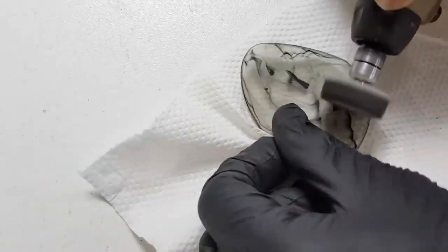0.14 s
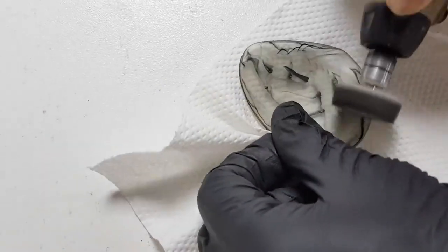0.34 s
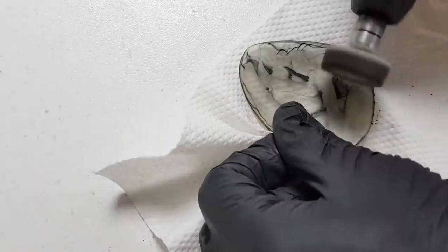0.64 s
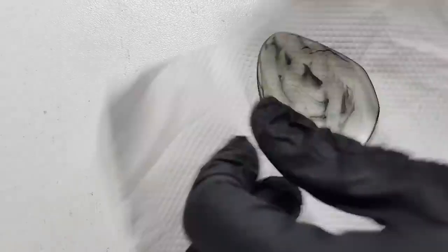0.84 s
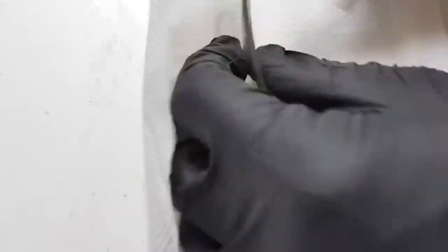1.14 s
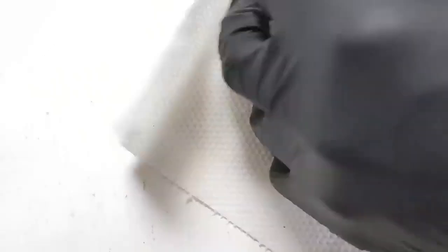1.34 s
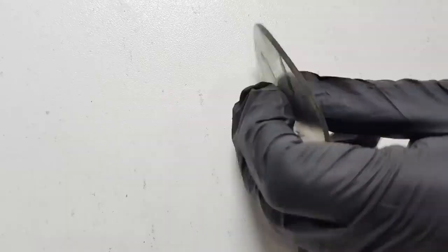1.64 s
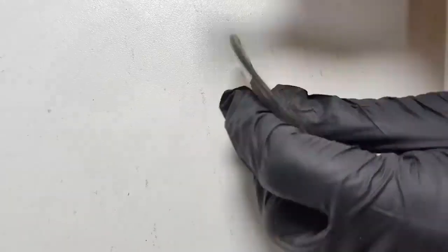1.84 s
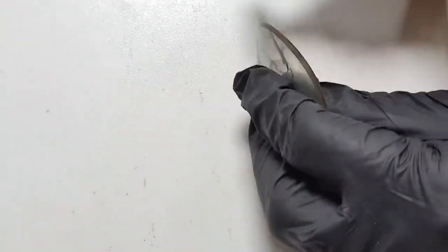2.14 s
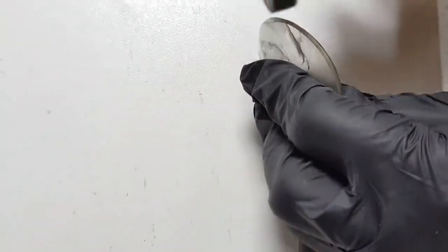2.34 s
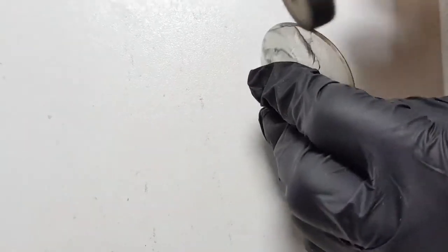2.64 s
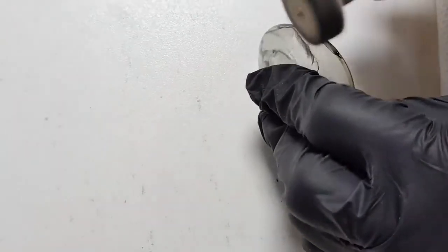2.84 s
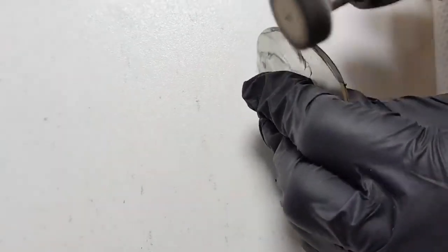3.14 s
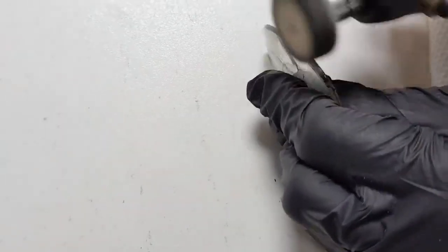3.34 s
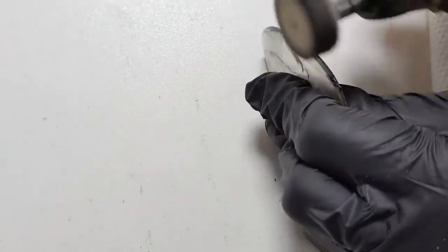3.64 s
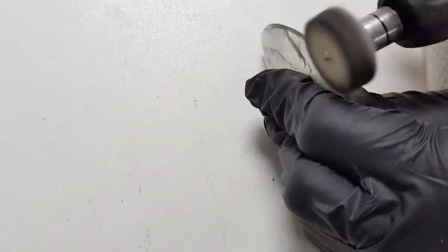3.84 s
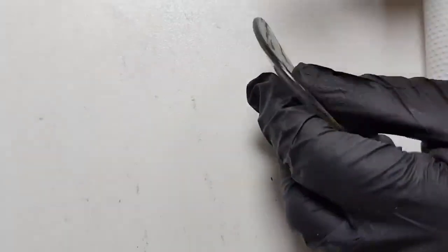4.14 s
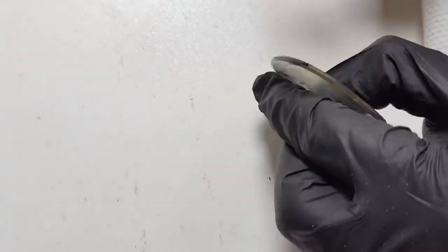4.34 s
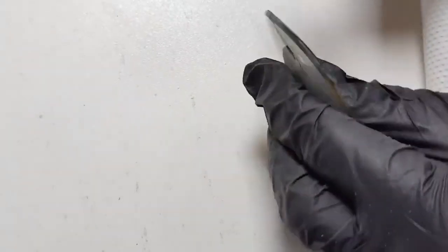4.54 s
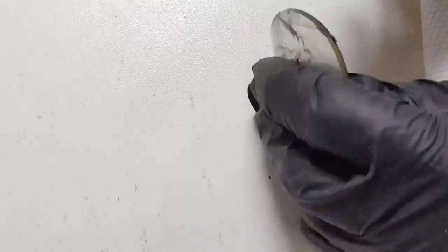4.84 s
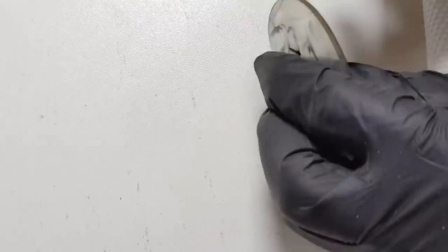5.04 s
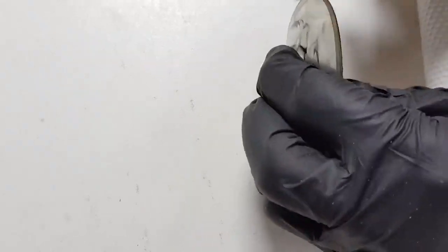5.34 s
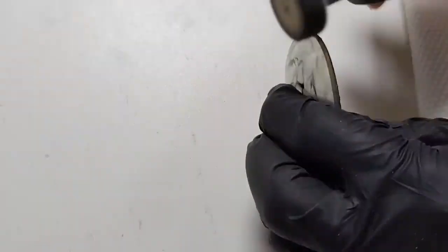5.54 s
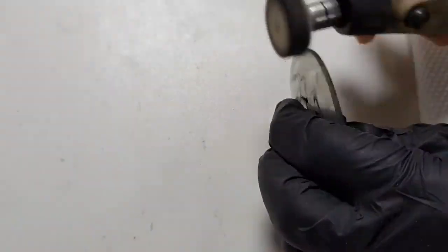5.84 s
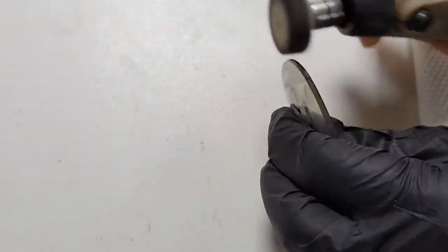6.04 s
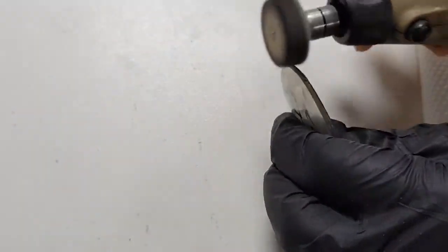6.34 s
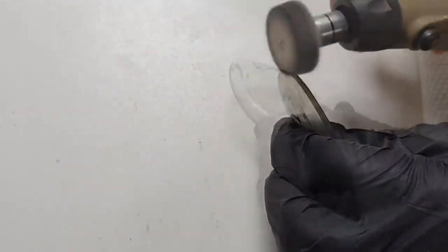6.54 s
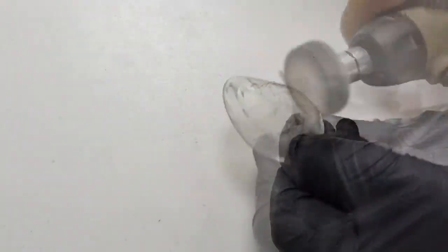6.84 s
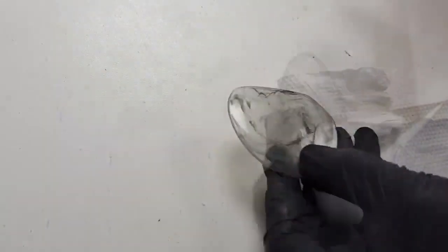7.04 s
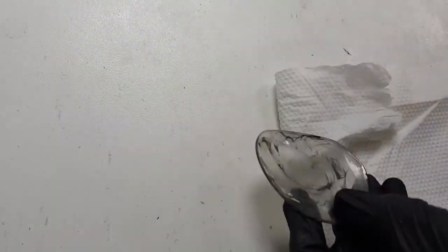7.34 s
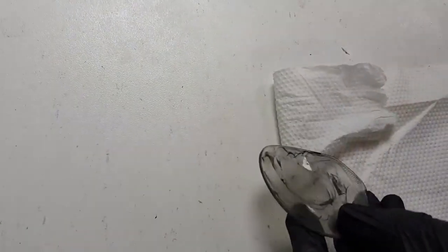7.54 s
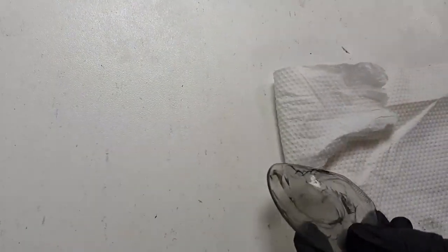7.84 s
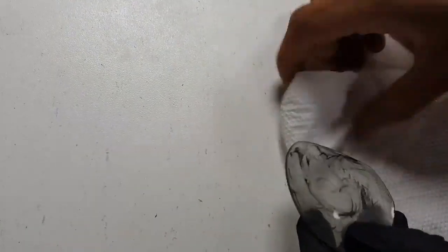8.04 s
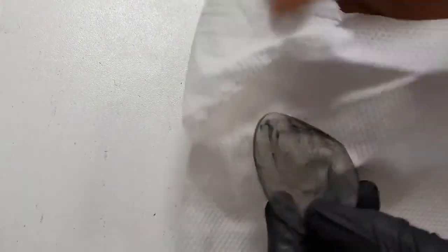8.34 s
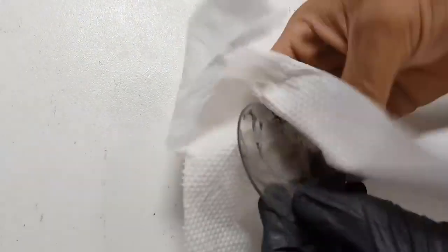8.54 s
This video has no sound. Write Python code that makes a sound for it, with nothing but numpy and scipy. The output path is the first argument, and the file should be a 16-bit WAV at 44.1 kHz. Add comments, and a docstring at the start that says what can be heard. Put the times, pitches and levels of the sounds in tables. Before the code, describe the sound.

High buzzing motor whine sags with each felt-wheel touch on a lens, soft bumps around it, then a sudden quiet, fading whirr and hard knock.

```python
"""Rotary tool on a lens

A hand-held rotary tool whines close to the right microphone, slowing whenever its felt wheel presses on a lens.
Its mains-fed motor is built from sines at multiples of the shaft speed, over fan hiss of coloured noise.
Hands bump the table (short noise puffs) and the lens is tapped (sharp swings).
The scene jumps to the motor coasting down in a quiet room, its whine and hiss fading;
the tool slides onto the table with a knock, made by ringing table modes."""
import sys
import numpy as np
from scipy import signal
from scipy.fft import rfft, irfft
from scipy.io import wavfile

SR = 44100
rng = np.random.default_rng(int(sys.argv[2]) if len(sys.argv) > 2 else 0)


def invert_db(level):
    """Linear amplitude ratio for a level in decibels (20 dB per decade), elementwise."""
    return 10 ** (np.asarray(level, dtype=float) / 20)


def transcribe(u):
    """Save the signal u as a 16-bit wav file named by the first command-line argument.

    u: samples, shape (n,) or (channels, n), limited to [-1, 1]; the rate is SR.
    q: integer samples, one column per channel.
    """
    v = np.clip(np.atleast_2d(u).T, -1, 1)
    q = np.round(v * 32767).astype(np.int16)
    wavfile.write(sys.argv[1], SR, q)


N = 382699   # length in samples


def rms_one(x):
    """Scale to unit rms."""
    return x / np.sqrt(np.mean(x ** 2) + 1e-20)


def in_time(rows):
    """Columns of a table whose first column is t/s, drawn out to one value per sample."""
    s, *columns = np.transpose(rows)
    return [np.interp(np.arange(N) / SR, s, c) for c in columns]


def at_hz(points, hz):
    """Read a table whose first column is f/Hz on a log-frequency axis."""
    known_hz, values = np.transpose(points)
    return np.interp(np.log(hz + 1), np.log(known_hz + 1), values)


def power_sum(*levels_db):
    """Level of unrelated sounds heard together: their powers add."""
    return 10 * np.log10(sum(invert_db(db) ** 2 for db in levels_db))


def gate(start, length, edge):
    """Soft-edged window in time, 0 to 1; all three in seconds."""
    t = np.arange(N) / SR
    return .5 * (np.tanh((t - start) / edge) - np.tanh((t - start - length) / edge))


def lift_db(hz, peak):
    """Lift given by a resonance (f/Hz, full width/Hz, lift/dB)."""
    peak_hz, width_hz, height_db = peak
    return height_db / (1 + (2 * (hz - peak_hz) / width_hz) ** 2)


def drift(rate):
    """Slow random wander of spread 1: noise smoothed twice at a fortieth of the sample rate."""
    r = np.exp(-80 * np.pi * rate / SR)
    noise = rng.standard_normal(N // 40 + 2002)
    slow = signal.lfilter([1], [1, -2 * r, r * r], noise)[2000:]
    return np.interp(np.arange(N) / 40, np.arange(len(slow)), rms_one(slow))


# usual stereo balance: [f/Hz, left minus right level/dB]
LEFT_DB = [(150, -12.5), (380, -9.5), (950, -12), (2380, -16.5), (5980, -10.5), (15000, -17.5)]


def sides(hz, balance=LEFT_DB):
    """Left and right gains at a pitch; the mean of both is 1."""
    left = invert_db(at_hz(balance, hz))
    return 2 * np.array([left, np.ones_like(left)]) / (1 + left)


def tone(hz, level_db, waver_db, blur=0, balance=LEFT_DB, start=None):
    """A wavering stereo sine; start is its set phase, or else random for each side; blur roughens its pitch."""
    start = 2 * np.pi * rng.random((2, 1)) if start is None else start
    phase = 2 * np.pi * np.cumsum(hz) / SR + start + blur * drift(39)
    step = np.arange(0, N, 64)   # the gain is held for 64 samples
    level = invert_db((level_db + waver_db * drift(13.7))[step])
    audible = hz[step] < .45 * SR
    gain = sides(hz[step], balance) * level * audible
    return np.sqrt(2) * np.repeat(gain, 64, axis=1)[:, :N] * np.sin(phase)


# borders between rumble, low, middle and top hiss: [f/Hz]
ZONE_EDGES_HZ = [900, 6200, 10000]


def hiss(spectrum_db, zones_db, patchy_db, likeness):
    """Coloured stereo noise; rumble and three overlapping treble zones each follow their own level."""
    hz = np.fft.rfftfreq(N + 1, 1 / SR)
    shared, own = rfft(rng.standard_normal((2, N + 1)))
    alike = np.clip(likeness(hz), 0, 1)
    left = alike * shared + np.sqrt(1 - alike ** 2) * own
    pair = np.array([left, shared]) * sides(hz) * invert_db(spectrum_db(hz))
    above = [1] + [1 / (1 + (edge / (hz + 1)) ** 12) for edge in ZONE_EDGES_HZ] + [0]
    out = 0
    for k, level_db in enumerate(zones_db):
        part = irfft(pair * (above[k] - above[k + 1]), N + 1)[:, :N]
        out = out + part / np.std(part.mean(axis=0)) * invert_db(level_db + patchy_db[k] * drift(18.7))
    return out


FREE_TURNS, START_TURNS = 1033.3, 921   # shaft speed running free and at the start, turns per s
SPIN_UP_S, PRESS_EDGE_S = 0.2686, 0.0266   # lag of the shaft; softness of each press
BEAT_SHARPNESS = 1.6   # the beat rises more steeply than the pressure
# the wheel is pressed on the lens:
# [t/s, length/s, drag/turns per s, low beat level/dB, high beat level/dB]
STROKES = [(0.225, 0.198, 331, -52, -57), (0.425, 0.139, 335, -59, -55), (0.562, 0.135, 289, -60, -60),
           (0.716, 0.107, 228, -60, -59), (0.842, 0.02, 1050, -60, -58), (2.498, 0.082, 191, -71, -60),
           (2.729, 0.025, 405, -70, -70), (2.798, 0.153, 235, -75, -52), (2.971, 0.104, 279, -69, -54),
           (3.097, 0.107, 266, -76, -54), (3.232, 0.126, 232, -71, -53), (3.398, 0.043, 298, -78, -50),
           (3.464, 0.032, 483, -75, -52), (3.513, 0.145, 194, -72, -55), (3.705, 0.064, 184, -75, -55),
           (3.784, 0.119, 194, -68, -55), (3.921, 0.078, 188, -72, -57), (4.028, 0.032, 405, -76, -54),
           (5.231, 0.159, 109, -65, -70), (5.401, 0.12, 187, -63, -52), (5.557, 0.075, 278, -72, -53),
           (5.687, 0.115, 236, -69, -52), (5.824, 0.113, 185, -76, -57), (6.027, 0.111, 136, -70, -63),
           (6.212, 0.093, 227, -59, -53), (6.346, 0.084, 237, -63, -52), (6.451, 0.103, 197, -71, -62),
           (6.64, 0.114, 180, -57, -56), (6.79, 0.03, 314, -72, -70), (6.891, 0.059, 290, -70, -52)]


def strokes():
    """Pressure drags the shaft, which lags behind it; returns speed, drag, low and high wheel beat (dB)."""
    drag, low, high = np.zeros((3, N)) + 1e-12
    for start, length, turns, low_db, high_db in STROKES:
        press = gate(start, length, PRESS_EDGE_S)
        beat = (press / press.max()) ** (2 * BEAT_SHARPNESS)
        drag = drag + turns * press
        low = low + invert_db(low_db) ** 2 * beat
        high = high + invert_db(high_db) ** 2 * beat
    r = np.exp(-1 / (SPIN_UP_S * SR))
    speed = signal.lfilter([1 - r], [1, -r], FREE_TURNS - drag, zi=[START_TURNS * r])[0]
    return speed, drag, 10 * np.log10(low), 10 * np.log10(high)


FLAT_UNTIL_S, BUZZ_GROWS_S = 0.9, 0.45   # the lens buzzes up to the first time, swelling up to the second


def lens_buzz(low):
    """Level of the buzz while the lens lies flat on the table: it follows the low wheel beat."""
    t = np.arange(N) / SR
    return np.where(t < FLAT_UNTIL_S, low - 40 * np.maximum(BUZZ_GROWS_S - t, 0), -120)


# first six shaft multiples, wheel running free at full speed: [level/dB]
IDLE_DB = [-76.5, -88, -64, -69.5, -67.5, -68]
IDLE_DB_PER_TURN = 0.25   # the upper four fade as the shaft slows
# share of the low beat in the 1st and 2nd multiple: [level/dB]
BEAT_SHARE_DB = [-6.5, -17.5]
# resonance of the lens, lifts the second multiple: [f/Hz, half width/Hz, lift/dB]
LENS_RING = (1600, 120, 12)
# stereo balance of the lens tones, also leaning right: [f/Hz, left minus right level/dB]
LENS_LEFT_DB = [(1000, -11.5), (3000, -17.5)]
# how the 3rd to 6th multiples radiate from the lens: [f/Hz, level/dB]
LENS_COLOUR = [(2300, -10), (2600, -13), (2800, -18), (3400, -8), (3800, -7), (4250, -13), (4650, -21),
               (5300, -4), (5700, -13)]
# upper multiples of the flat lens against the low beat: [f/Hz, level/dB]
FLAT_COLOUR = [(2400, -4), (3300, -9), (5400, -11), (6350, 1), (7050, 4), (7900, -6), (11000, -12)]
# which shaft multiples above the sixth sound: [multiple]
ORDERS = [7, 9, 10, 11, 12, 13, 14, 15, 17, 18, 19, 20]
# their average levels, before the resonance and the buzz: [level/dB]
ORDERS_DB = [-72, -73, -65, -68, -63, -67, -63.5, -69, -68, -72, -65, -64]
# a higher resonance that lifts the top multiples: [f/Hz, width/Hz, lift/dB]
TOP_RING = (15250, 900, 7)


def shaft_multiples(turns, low, upper, flat, top_db):
    """The turning wheel sounds at whole multiples of the shaft speed; pressure adds to the first six."""
    ring_hz, half_hz, height_db = LENS_RING
    ring_db = lift_db(2 * turns, (ring_hz, 2 * half_hz, height_db))
    once_db = power_sum(IDLE_DB[0], low + BEAT_SHARE_DB[0])
    twice_db = power_sum(IDLE_DB[1], low + BEAT_SHARE_DB[1] + ring_db)
    out = tone(turns, once_db, waver_db=1.8, balance=LENS_LEFT_DB, start=0)
    out += tone(2 * turns, twice_db, waver_db=7.5, balance=LENS_LEFT_DB, start=0)
    for k in range(3, 7):
        hz = k * turns
        idle_db = IDLE_DB[k - 1] + IDLE_DB_PER_TURN * (turns - FREE_TURNS)
        level_db = power_sum(idle_db, upper + at_hz(LENS_COLOUR, hz), flat + at_hz(FLAT_COLOUR, hz))
        out += tone(hz, level_db, waver_db=3.0, blur=.35)
    for k, order_db in zip(ORDERS, ORDERS_DB):
        hz = k * turns
        level_db = power_sum(order_db + top_db + lift_db(hz, TOP_RING), flat + at_hz(FLAT_COLOUR, hz))
        out += tone(hz, level_db, waver_db=3.0, blur=.17)
    return out


CHOP_HZ = 378.9   # rate at which the mains current chops the motor
CHOP_LEAN = 0.3   # phase lean across the housing resonance: each current pulse is cut a little short
# armature slots, 8th and 16th multiple: [level/dB, fall per sideband below/dB, fall per sideband above/dB]
SLOTS = [(-71, 9, 2.5), (-90, 9, 9)]
# the same whine heard past the vents: [level/dB, fall per sideband/dB]
SLOTS_DIRECT = [(-64, 4), (-62.5, 12)]
# its change as the vents turn to the microphone, 8th and 16th: [dB per dB of turn]
DIRECT_PER_TURN = [-1.23, -0.62]
# housing resonance: [f/Hz, width/Hz, lift/dB]
CASING = (8320, 750, 16)


def slot_whine(turns, flat, near_db, vent_db):
    """Armature slots whine at 8 and 16 times the shaft speed; the chopped current adds sidebands."""
    eight_db = near_db + vent_db
    eight_db = eight_db - eight_db.mean()
    near_db = near_db - near_db.mean()
    out = np.zeros((2, N))
    for k, vented, direct, per_turn in zip((8, 16), SLOTS, SLOTS_DIRECT, DIRECT_PER_TURN):
        level_db, below_db, above_db = vented
        direct_db, side_db = direct
        for j in range(-4, 6):
            hz = k * turns + j * CHOP_HZ
            fall_db = above_db * j if j > 0 else -below_db * j
            vented_db = level_db - fall_db + eight_db + lift_db(hz, CASING)
            past_db = direct_db - side_db * abs(j) + near_db + per_turn * vent_db + lift_db(hz, TOP_RING) / 2
            buzz_db = flat + at_hz(FLAT_COLOUR, hz) - 30 * abs(j)
            lean = CHOP_LEAN * np.arctan(2 * (hz - CASING[0]) / CASING[1])
            out += tone(hz, power_sum(vented_db, past_db, buzz_db), waver_db=2.5, blur=.12, start=lean)
    return out


BEARING_RATIO, ROUGH_RATIO = 4.36, 14.84   # ball-bearing tone and rough whistle, cycles per turn
# bearing tones: [multiple of the bearing tone, plus shaft turns]
BEARING = [(1, 0), (1, 1), (1, -1), (1, 2), (3, 0), (4, 0), (4, -1), (4, 1), (3, -1), (3, 1), (3, 2),
           (4, -2)]
# their average levels, before the resonance: [level/dB]
BEARING_DB = [-75, -85, -78, -80, -63.5, -59, -67, -66, -73, -66.5, -68, -74]
# how far each bearing multiple follows the wheel beat: {multiple: share}
LOAD_SHARE = {1: .5, 3: .1, 4: .1}


def bearing_tones(turns, upper, top_db):
    """Balls roll at an uneven ratio to the shaft; load on the wheel loads them too."""
    load_db = power_sum(upper, -62.5)
    load_db = load_db - load_db.mean()
    out = np.zeros((2, N))
    for (k, j), ball_db in zip(BEARING, BEARING_DB):
        hz = (k * BEARING_RATIO + j) * turns
        level_db = ball_db + top_db + lift_db(hz, TOP_RING) + LOAD_SHARE[k] * load_db
        out += tone(hz, level_db, waver_db=3.0, blur=.25)
    # a rough whistle, strongest at full speed
    rough_db = -51 + top_db + 0.14 * (turns - turns.max())
    return out + tone(ROUGH_RATIO * turns, rough_db, waver_db=2.0, blur=1.8)


# the free wheel grazes something: [t/s, length/s]
GRAZE = (2.068, 0.178)
# the graze heard once and twice a turn: [level/dB]
GRAZE_DB = (-56.5, -57.5)
SKIP_S, SKIP_IN_DB, SKIP_OUT_DB = 0.033, -55.5, -67   # skipping as it enters and as it leaves


def graze(turns):
    """The free wheel rubs once and twice a turn, skipping every other turn as it enters and leaves."""
    (start, length), (once_db, twice_db) = GRAZE, GRAZE_DB
    rub = tone(turns, once_db, waver_db=3.5, blur=0.21, balance=LENS_LEFT_DB)
    rub += tone(2 * turns, twice_db, waver_db=5.0, blur=0.16, balance=LENS_LEFT_DB)
    out = gate(start, length, 0.015) * rub
    # a weak-strong beat sounds the half multiples
    for s, level_db in ((start, SKIP_IN_DB), (start + length - SKIP_S, SKIP_OUT_DB)):
        halves = tone(turns / 2, level_db - 3, waver_db=1.5) + tone(3 * turns / 2, level_db, waver_db=1.5)
        out += gate(s, SKIP_S, .002) * halves
    return out


CHATTER_DB = 2.5   # the wheel bounces unevenly on the lens


def motor(turns, low, upper, near_db, vent_db, top_db):
    """Shaft multiples, slot whine, bearing tones and graze, over a nearly steady hum from the mains."""
    top_db = top_db - top_db.mean()
    flat = lens_buzz(low)
    upper = upper + CHATTER_DB * drift(25)
    out = shaft_multiples(turns, low, upper, flat, top_db)
    out += slot_whine(turns, flat, near_db, vent_db)
    out += bearing_tones(turns, upper, top_db)
    out += graze(turns)
    return out + tone(np.full(N, 6 * CHOP_HZ), -73.5, waver_db=1.5)   # mains hum


def grit(turns, beat_db):
    """Felt rubbing on the lens: noise that pulses once a turn and follows the wheel beat."""
    pulse = 1 + 0.29 * np.sin(2 * np.pi * np.cumsum(turns) / SR)
    band = signal.butter(4, [450, 2100], "band", fs=SR, output="sos")
    rubbing = signal.sosfilt(band, rng.standard_normal((2, N)) * pulse)
    return rms_one(rubbing) * invert_db(beat_db - 15.5)


LOW_HISS_DB, LOW_FOLLOWS, LOW_PER_TURN = -61.5, 0.55, -0.64   # low zone: level; dB per dB of nearness, turn
LOW_PER_LOAD_DB, GRAZE_HISS_DB = -0.5, 4   # low zone: change per 200 turns per s of drag; lift by the graze
VENT_HISS_DB, TOP_HISS_DB = -20.5, -0.5   # middle and top zones, against nearness
HANDLING_DB = -76.5   # gloves and paper rumbling
# the hands take a new grip: [t/s, half length/s, level/dB]
REGRIPS = [(0.353, 0.25, -72.5), (2.03, 0.084, -67), (5.18, 0.23, -72)]
# shape of the fan hiss, before each zone is set to its level: [f/Hz, level/dB]
FAN_HISS = [(35, -81), (60, -41.5), (261, -27.5), (563, -17), (780, -23), (985, -16), (1680, -29.5),
            (2230, -11), (4180, -6.5), (4650, -12.5), (5150, -8.5), (5600, -6), (7850, 4), (9680, -13.5),
            (15800, -8)]
# likeness of left and right: [f/Hz, likeness 0 to 1]
LIKENESS = [(150, 0.21), (600, 0.77), (2400, 0.19), (15000, 0.27)]


def fan_air(drag, near_db, vent_db, top_db, grazing):
    """Fan hiss in three zones, pulsing with the mains current, and the rumble of handling."""
    t = np.arange(N) / SR
    low_db = LOW_HISS_DB + LOW_FOLLOWS * (near_db - near_db.mean()) + LOW_PER_TURN * vent_db
    low_db += LOW_PER_LOAD_DB * drag / 200 + GRAZE_HISS_DB * grazing
    grips_db = [db - 6 * ((t - s) / half) ** 2 for s, half, db in REGRIPS]
    handling_db = power_sum(HANDLING_DB, *grips_db)
    zones_db = [handling_db, low_db, near_db + vent_db + VENT_HISS_DB, top_db + TOP_HISS_DB]
    air = hiss(lambda hz: at_hz(FAN_HISS, hz) + 0.36 * lift_db(hz, CASING), zones_db,
               [2.56, 1.7, 0.76, 0.96], lambda hz: at_hz(LIKENESS, hz))
    # brush hiss pulses with the mains current
    air *= 1 - 0.3 * sum(np.sin(2 * np.pi * k * CHOP_HZ * t) / k for k in range(1, 4))
    # little bass while the motor runs
    return signal.sosfilt(signal.butter(6, 190, "high", fs=SR, output="sos"), air)


TOP_PER_TURN = -0.095   # the top fades a little as the vents turn to the microphone, dB per dB
GRAZE_GRIT_DB = -45.5   # wheel beat that the graze adds to the grit
# the hand moves the tool: [t/s, nearness level/dB, turn of the vents to the microphone level/dB]
FACING = [(0.0, -49, 9.5), (0.07, -47, 10), (0.61, -48.5, 6.5), (0.65, -46, 8.5), (0.73, -48.5, 4),
          (1.48, -44.5, 0), (1.78, -50.5, 5), (1.86, -43, 3.5), (1.98, -49, -3), (4.09, -49, -3.5),
          (4.34, -49, -2), (5.12, -49.5, -7), (5.41, -50.5, -3.5), (6.89, -48, -2)]


def running_tool():
    """The motor at work: wheel pressure and the hand's position steer whine, hiss and grit together."""
    turns, drag, low_beat, high_beat = strokes()
    near_db, vent_db = in_time(FACING)
    top_db = near_db + TOP_PER_TURN * vent_db
    grazing = gate(*GRAZE, 0.0051)
    out = motor(turns, low_beat, high_beat, near_db, vent_db, top_db)
    out += fan_air(drag, near_db, vent_db, top_db, grazing)
    graze_db = GRAZE_GRIT_DB + 20 * np.log10(grazing + 1e-9)
    return out + grit(turns, power_sum(low_beat, -84.5, graze_db))


# the tool strikes the table: [t/s, strike level/dB]
KNOCKS = [(7.534, -42.5), (7.605, -53), (7.661, -35), (7.692, -10.5), (7.716, -20.5), (7.762, -29),
          (7.788, -26.5), (7.834, -41), (7.871, -42.5), (7.911, -46)]
# tool sliding into place: [t/s, level/dB]
DRAG = [(7.5, -80), (7.54, -70), (7.68, -61), (7.715, -50), (7.8, -58), (7.815, -72), (8.0, -88)]
# ringing modes of the table: [f/Hz, level/dB, time to fall 60 dB/s]
TABLE_MODES = [(219.7, -2, 0.085), (264, -1, 0.05), (321, -8, 0.05), (458, -6, 0.1), (596, -10, 0.05),
               (1095, -19, .04), (1400, -18, .06), (1780, -13, 0.06), (2550, -11, .03)]
# stereo balance of the table: [f/Hz, left minus right level/dB]
TABLE_LEFT_DB = [(120, 1), (250, -6.5), (550, -37), (1650, -8)]


def knocks():
    """Soft contacts, and a dense patter of small ones while the tool slides, strike the table modes."""
    times, level_db = np.transpose(KNOCKS)
    at = (times * SR).astype(int)
    out, spread = np.zeros((2, N)), rng.standard_normal((len(KNOCKS), len(TABLE_MODES)))
    sliding = gate(DRAG[0][0], DRAG[-1][0] - DRAG[0][0], .01)
    patter = (rng.random(N) < 400 / SR) * invert_db(in_time(DRAG)[0]) * sliding   # about 400 contacts per s
    for k, (hz, mode_db, t60) in enumerate(TABLE_MODES):
        clicks = patter * rng.standard_normal(N) * invert_db(mode_db) + 1e-18
        clicks[at] -= invert_db(level_db + mode_db - 11.5 + 1.5 * spread[:, k])
        r, w = invert_db(-60 / (t60 * SR)), 2 * np.pi * hz / SR
        ringing = signal.lfilter([0, np.sin(w)], [1, -2 * r * np.cos(w), r * r], clicks)
        out += ringing * sides(np.array([hz]), TABLE_LEFT_DB)
    out = signal.sosfilt(signal.butter(2, 360, fs=SR, output="sos"), out)   # soft contact
    return signal.sosfilt(signal.butter(6, 195, "high", fs=SR, output="sos"), out)


BUMP_T60_S = 0.094   # time for the puff's noise to fall 60 dB
# hands and lens bumping: [t/s, peak level before balance and bass cut/dB, centre f/Hz]
BUMPS = [(0.244, -54, 300), (0.328, -53, 487), (0.508, -58, 427), (0.592, -48.5, 290), (0.626, -51, 258),
         (0.878, -45, 676), (1.896, -35.5, 290), (1.921, -49, 204), (2.458, -40, 334), (4.334, -61.5, 208),
         (4.999, -52.5, 205), (5.215, -41, 296), (5.814, -52.5, 287), (6.098, -60, 530),
         (6.382, -47.5, 297), (6.486, -49.5, 224), (6.709, -54.5, 326), (8.125, -65, 1350)]
# lens taps: [t/s, level/dB, centre f/Hz]
TICKS = [(1.919, -38, 3000), (5.3985, -26, 1800)]


def bumps():
    """Each soft bump is a short puff of noise through a broad resonance; each tap a single sharp swing."""
    out, t = np.zeros((2, N)), np.arange(int(.15 * SR)) / SR
    for (s, level_db, hz), noise in zip(BUMPS, rng.standard_normal((len(BUMPS), 2, len(t)))):
        noise[0] = .8 * noise[1] + .6 * noise[0]   # left and right partly alike
        band = signal.butter(2, [hz * .5, hz * 1.62], "band", fs=SR, output="sos")
        puff = signal.sosfilt(band, noise * invert_db(-60 * t / BUMP_T60_S) * np.minimum(t / 0.0016, 1))
        puff *= invert_db(level_db) / np.abs(puff).max()
        out[:, int(s * SR):int(s * SR) + len(t)] += puff * sides(np.array([hz]))
    dull = signal.butter(4, 4200, fs=SR, output="sos")
    for s, level_db, hz in TICKS:
        swing = np.sin(2 * np.pi * hz * t) * np.exp(-t * hz * 2.6)
        swing = signal.sosfilt(dull, swing) * invert_db(level_db + 7.5)
        out[:, int(s * SR):int(s * SR) + len(t)] += swing * sides(np.array([hz]), LENS_LEFT_DB)
    return signal.sosfilt(signal.butter(3, 145, "high", fs=SR, output="sos"), out)


# shaft after the jump: [t/s, speed/turns per s, whine level/dB, lift by the housing resonance/dB]
COAST_SPEED = [(6.9, 1560, -81, 7), (7.06, 1610, -79, 10), (7.3, 1335, -85, 5), (7.5, 1114, -89, 20),
               (7.58, 1033, -90, 18), (7.7, 915, -92, 19), (8.0, 700, -105, 10)]
# housing resonance heard as the whine dies: [f/Hz, half width/Hz, hiss lift/dB]
COAST_RING = (6550, 380, 3.5)


def coasting_whine():
    """Shaft multiples and bearing tones die away as the motor coasts, lifted where they cross the housing."""
    turns, whine_db, ring_db = in_time(COAST_SPEED)
    ring_hz, half_hz, _ = COAST_RING
    out = np.zeros((2, N))
    for k in [*range(1, 10), *(BEARING_RATIO + np.arange(-3, 3))]:
        softer_db = 3 * (k % 1 > 0)   # bearing tones
        level_db = whine_db - softer_db + lift_db(k * turns, (ring_hz, 2 * half_hz, ring_db))
        out += tone(k * turns, level_db, waver_db=5.0, blur=.5)
    return out


JUMP_S, FASTER_S = 6.905, 8.04   # the jump; from the second time the hiss falls faster
ROOM_DB, BOOM_DB, BOOM_T60_S = -73, -45, 0.46   # room rumble; its boom after the main knock, 60 dB fall time
# coasting hiss in the low, middle and top zones:
# [level at the jump/dB, fall/dB per s, extra fall from FASTER_S on/dB per s]
COAST_ZONES = [(-73.5, 5, 23), (-71, 5, 48), (-57, 13, 73)]
# shape of the coasting hiss, before each zone is set to its level: [f/Hz, level/dB]
COAST_HISS = [(30, -29), (209, -6), (596, -22.5), (747, -24.5), (1580, -2.5), (1980, -12.5), (2300, -1),
              (4700, -4.5), (6580, -6), (11400, -13.5), (15800, 6)]
# paper towel starts to rustle faintly: [t/s, level/dB]
RUSTLE = (8.6, -82)


def quiet_room():
    """Dying fan hiss, a faint rustle at the end, and a room rumble that booms after the main knock."""
    t = np.arange(N) / SR
    low_db, middle_db, top_db = [db - fall * (t - JUMP_S) - extra * np.maximum(t - FASTER_S, 0)
                                 for db, fall, extra in COAST_ZONES]
    rustle_db = np.where(t > RUSTLE[0], RUSTLE[1], -200)
    middle_db, top_db = power_sum(middle_db, rustle_db), power_sum(top_db, rustle_db)
    since = t - max(KNOCKS, key=lambda row: row[1])[0]
    rumble_db = power_sum(ROOM_DB, np.where(since > 0, BOOM_DB - 60 * since / BOOM_T60_S, -200))
    ring_hz, half_hz, height_db = COAST_RING
    ring = (ring_hz, 2 * half_hz, height_db)
    return hiss(lambda hz: at_hz(COAST_HISS, hz) + lift_db(hz, ring), [rumble_db, low_db, middle_db, top_db],
                [1.1, 0.13, 0.44, 3.2], lambda hz: 0.92 / (1 + (hz / 1200) ** 2))


def scene():
    """Running motor up to the jump, coasting motor after it; bumps and table knocks on top."""
    after = np.clip((np.arange(N) / SR - JUMP_S) / 0.0014, 0, 1)
    running = running_tool()
    coasting = coasting_whine() + quiet_room()
    return running * (1 - after) + coasting * after + bumps() + knocks()


def band_limit(x):
    """A steep low-pass at the top of the band."""
    return signal.sosfilt(signal.butter(12, 16980, fs=SR, output="sos"), x)


def record(dry):
    """The top is cut steeply above 15760 Hz and the left channel lags by one sample."""
    low_pass = signal.ellip(12, .5, 70, 15760, fs=SR, output="sos")
    mix = signal.sosfilt(low_pass, dry)
    mix[0] = np.roll(mix[0], 1)
    return band_limit(mix)


dry = scene()
out = record(dry)
transcribe(out)
```